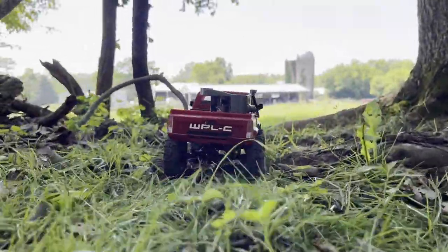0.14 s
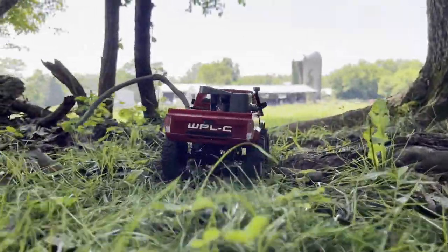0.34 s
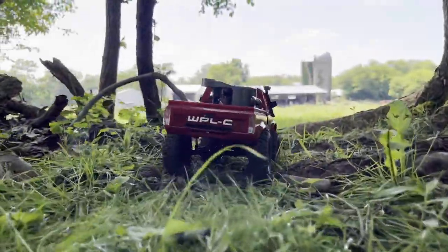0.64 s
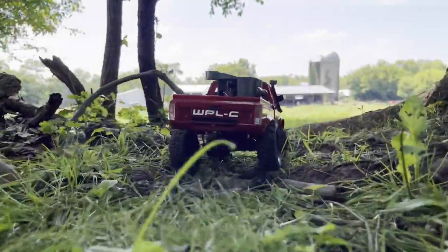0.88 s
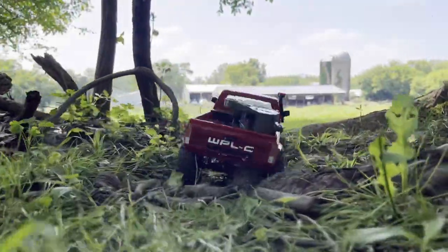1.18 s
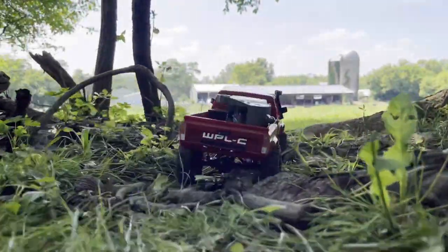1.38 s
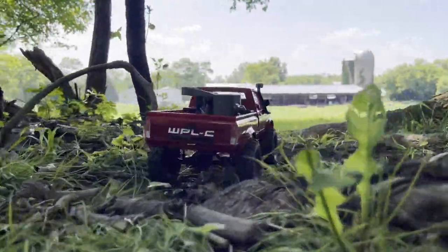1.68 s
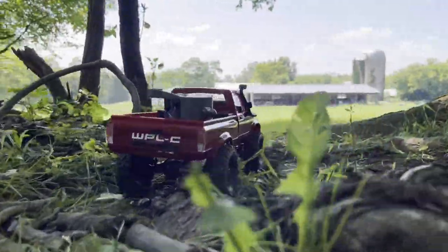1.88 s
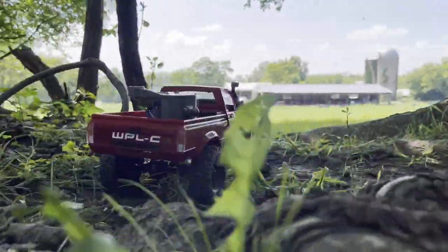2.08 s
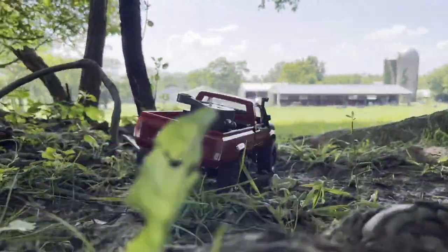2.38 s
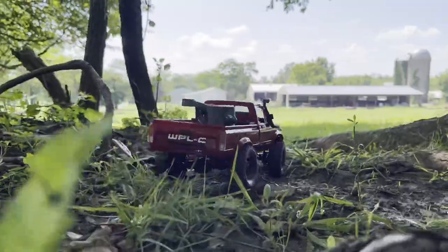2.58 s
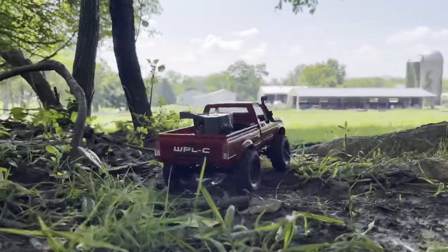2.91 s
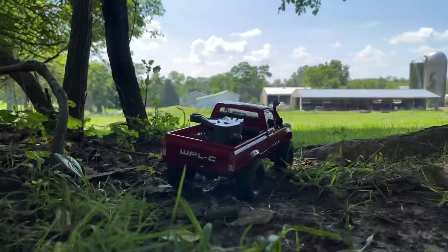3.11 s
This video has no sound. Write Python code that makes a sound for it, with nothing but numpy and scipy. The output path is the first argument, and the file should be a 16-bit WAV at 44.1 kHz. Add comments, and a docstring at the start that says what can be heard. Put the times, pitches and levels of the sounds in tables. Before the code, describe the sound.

A small electric toy truck crawls over rough ground. Two tiny hisses and faint gear whirs open; light knocks come around 0.3-0.7 s. From 1.0 to 1.45 s gears whine and rattle with hard plastic knocks and grass snaps. A lull to 2.0 s leaves wind thumps, distant engine hum and faint chirps. Fuller whining, rattling and sharp knocks around 2.3, 2.6 and 2.85 s continue, easing towards 3.25 s.

```python
"""Toy truck over rough ground

A small electric toy truck crawls over grass, roots and dirt. Its plastic gears rattle (shaped noise) and whine
with the load (sines at the tooth rate); the chassis knocks (decaying rings) and grass snaps (noise bursts).
Two thin hisses open the scene. Wind puffs thump on the microphones (low noise and falling pulses), a far engine
hums (wavering sines), a small bird chirps (arched whistles) and soft country air (noise) lies behind it all."""
import sys
import numpy as np
from scipy import signal
from scipy.fft import rfft, irfft, next_fast_len
from scipy.io import wavfile
from scipy.ndimage import uniform_filter1d, map_coordinates

SR = 44100
rng = np.random.default_rng(int(sys.argv[2]) if len(sys.argv) > 2 else 0)


def persist_wave(psi):
    """Save psi, clipped to +-1, as 16-bit WAV."""
    counts = np.round(np.clip(psi, -1, 1) * 32767).astype(np.int16)
    wavfile.write(sys.argv[1], SR, np.atleast_2d(counts).T)


def gain_from_db(level_db):
    """Turn a decibel level (scalar or array-like) into a linear amplitude factor."""
    decades = np.asarray(level_db, float) / 20
    return 10 ** decades


N = 143325
T = np.arange(N) / SR

# Event and source levels below are relative: each source sets its final trim. Spectra give shape only.

# gear train noise: (time [s], level [dB], treble over that level [dB])
DRIVE = [(0.0, -56, -13), (0.05, -61, -10.5), (0.1, -58, -10.5), (0.19, -67, -13.5), (0.37, -53, -8),
         (0.5, -53, -12), (0.71, -45, -3.5), (0.72, -48, -6.5), (0.84, -58.5, -7.5), (0.97, -58.5, -7),
         (1.071, -44, -4), (1.091, -35.5, -10), (1.181, -49, -11), (1.22, -41, -11), (1.23, -42.5, -13.5),
         (1.279, -39.5, -6.5), (1.31, -49, -11), (1.36, -50, -8.5), (1.43, -44, -8.5), (1.54, -61.5, -12.5),
         (1.58, -55, -5), (1.61, -61.5, -9), (1.92, -67, -21), (1.94, -64, -8), (1.96, -65, -9.5),
         (2.11, -46.5, -5), (2.18, -46, 1), (2.22, -43, -5), (2.28, -43.5, 4), (2.313, -47.5, 0),
         (2.34, -43, -1.5), (2.36, -46.5, -5.5), (2.45, -45.5, -1), (2.51, -41.5, -5.5), (2.57, -43, -9.5),
         (2.611, -39.5, -4.5), (2.73, -45, -11), (2.84, -42, -12.5), (2.85, -41, -2.5), (2.87, -39.5, -8),
         (3.03, -50, -8), (3.25, -48, -6)]
# gear whines, one table each: (time [s], tooth rate [Hz], level of 1st, 2nd, 3rd multiple [dB, dB, dB])
WHINES = [
    [(0.0, 1056, -66, -67.5, -64), (0.008, 1060, -72, -62, -63), (0.024, 1062, -80, -68, -61.5),
     (0.04, 1082, -87, -87, -84), (0.072, 1060, -86, -78, -61), (0.078, 1066, -82, -106, -68),
     (0.088, 1045, -81, -81, -60), (0.1, 1094, -78, -58, -54), (0.13, 1120, -88, -90, -75)],
    [(0.3, 1084, -72, -70, -87), (0.318, 1097, -64, -72, -91), (0.332, 1059, -77, -62, -76),
     (0.352, 1083, -57.5, -63, -85), (0.364, 1132, -62, -62, -79), (0.382, 1093, -63, -64, -84),
     (0.43, 1170, -55.5, -59, -72), (0.47, 1150, -80, -73, -77)],
    [(0.6, 473, -67, -62, -57), (0.608, 492, -62, -77, -65), (0.622, 506, -71, -59, -74),
     (0.642, 599, -76, -46, -66), (0.66, 719, -85.5, -70, -53), (0.686, 821, -77, -53.5, -50),
     (0.706, 838, -65, -43.5, -45.5), (0.73, 850, -77, -69, -58)],
    [(0.78, 1273, -71, -83, -82), (0.786, 1303, -76, -80, -69), (0.792, 1290, -70, -83, -63),
     (0.796, 1263, -71, -96, -54), (0.8, 1310, -86, -83, -59), (0.804, 1265, -70, -83, -57),
     (0.82, 1260, -78, -90, -73)],
    [(1.02, 911.7, -51, -57, -73), (1.036, 1025, -55, -51, -80), (1.042, 1063, -54, -57, -70),
     (1.062, 1192, -48, -50, -62), (1.07, 1240, -58, -66, -65), (1.076, 1300, -61, -60, -69),
     (1.085, 1297, -53, -51, -51)],
    [(1.22, 1155, -56, -58, -64), (1.23, 1163, -58, -42, -65), (1.242, 1135, -54, -46, -67),
     (1.25, 1158, -63, -44, -70), (1.266, 1111, -44, -46, -58), (1.274, 1080, -50, -40, -60),
     (1.284, 1032, -50, -41.5, -58), (1.3, 1025, -60, -54, -69)],
    [(1.37, 1198, -59, -71, -74), (1.382, 1185, -58, -52, -69), (1.392, 1190, -59, -60, -64),
     (1.4, 1202, -67, -63, -65), (1.414, 1207, -65, -51, -58), (1.422, 1193, -71, -66, -69),
     (1.442, 1220, -66, -52, -76), (1.45, 1184, -64, -64, -74)],
    [(1.553, 1062, -82, -75, -76), (1.559, 1155, -77, -76, -63), (1.569, 1276, -77, -51, -63),
     (1.573, 1250, -77, -58, -59), (1.579, 1154, -72, -64, -62), (1.587, 1080, -71, -55, -58),
     (1.593, 1000, -68, -69, -77), (1.6, 977.5, -68, -81, -83)],
    [(2.06, 515, -76, -68, -70), (2.066, 548, -78, -62, -66), (2.08, 634.5, -80, -75, -53.5),
     (2.102, 724, -81, -72, -52.5), (2.146, 878, -63, -52, -52.5), (2.17, 927, -63, -53, -52),
     (2.178, 900, -53, -61, -53), (2.19, 923.2, -59, -45, -65)],
    [(2.19, 935.8, -50, -48, -66), (2.224, 1112, -45, -46, -58), (2.25, 1173, -45, -42, -54),
     (2.272, 1143, -44, -46, -60), (2.31, 935, -66, -45, -44), (2.324, 966, -41.5, -61, -57),
     (2.34, 973, -59, -42, -65), (2.36, 950, -66, -62, -74)],
    [(2.44, 1484, -80, -66, -66), (2.466, 1430, -47, -59, -58), (2.502, 1304, -49, -43, -64),
     (2.518, 1300, -44, -46, -66), (2.542, 1265, -49, -45, -66), (2.55, 1260, -48, -51, -66),
     (2.565, 1313, -72, -55, -72)],
    [(2.57, 1178, -53, -54, -39), (2.582, 1180, -59, -46, -43), (2.594, 1247, -48, -37, -48),
     (2.606, 1181, -45, -36.5, -47), (2.63, 1156, -40, -44, -45), (2.636, 1160, -40.5, -38.5, -58),
     (2.65, 1100, -40.5, -50, -47), (2.67, 1140, -49, -66, -47)],
    [(2.84, 1086, -59, -51, -69), (2.852, 1060, -44, -39, -47), (2.858, 1085, -39.5, -29.5, -49),
     (2.866, 1000, -49, -52, -45), (2.872, 960, -59, -59, -61), (2.88, 969.3, -59, -65, -73)],
    [(2.885, 1250, -60, -50, -63), (2.912, 1225, -58, -46, -62), (2.93, 1162, -76, -49, -68),
     (2.944, 1226, -57, -43.5, -53), (2.96, 1184, -69, -44.5, -83), (2.97, 1130, -59, -51, -76),
     (2.985, 1120, -58, -62, -70)],
    [(2.985, 1295, -75, -71, -67), (3.001, 1333, -60, -54, -66), (3.015, 1203, -53, -55, -70),
     (3.037, 1070, -59, -52, -66), (3.069, 1058, -55.5, -64, -75), (3.085, 1207, -45.5, -65, -72),
     (3.101, 1330, -72, -47, -73), (3.11, 1320, -57.5, -55, -72)],
    [(3.11, 1456, -71, -58, -60), (3.132, 1485, -53, -46, -77), (3.148, 1495, -58, -48.5, -67),
     (3.168, 1490, -49, -64, -78), (3.186, 1305, -71, -58, -72), (3.2, 1240, -64, -71, -87),
     (3.226, 1285, -51, -61, -58), (3.25, 1310, -57, -68, -76)],
]
# higher multiples of the tooth rate: (multiple [number], level against the 3rd [dB])
HIGH_MULTIPLES = [(4, -9), (5, -17), (6, -18), (8, -17), (9, -17)]
# colour of the plastic shell: (frequency [Hz], density [dB per Hz])
SHELL = [(150, -39), (400, -15.5), (750, -10), (1150, -2.5), (1700, -8.5), (2350, -4), (2900, -10.5),
         (3300, -7.5), (3450, -6), (3620, -9), (4100, -9), (4300, -8), (4500, -11.5), (5000, -23),
         (5600, -72)]
# treble of the gear noise: (frequency [Hz], density [dB per Hz])
FIZZ = [(4000, -72), (5000, -6), (6400, -1), (7500, -5.5), (9000, 0.5), (10500, -3), (12000, -9),
        (13700, -14), (14300, -54), (15700, -76)]
# chassis knocks: (time [s], level [dB], pitch [Hz], decay by 60 dB [s])
KNOCKS = [(.309, -43.5, 895, 0.045), (0.372, -40.5, 965, 0.042), (0.549, -37, 576, 0.043),
          (.6, -39, 780, 0.026), (.711, -37, 670, 0.016), (1.085, -25, 1243, 0.024),
          (1.092, -23.5, 3880, 0.022), (1.104, -20, 4130, 0.0054), (1.114, -22, 4900, 0.008),
          (1.112, -27.5, 946, 0.035), (1.125, -27, 766, 0.02), (1.131, -35.5, 350, 0.11),
          (1.152, -32, 3300, 0.029), (1.2126, -21.5, 1254, 0.026), (1.2165, -22, 1285, 0.023),
          (1.507, -42, 2950, .02), (1.631, -50, 1970, 0.018), (1.933, -38, 956, 0.028),
          (1.988, -49, 1910, 0.033), (2.271, -28, 590, 0.023), (2.3172, -20.5, 3680, 0.013),
          (2.32, -26.5, 2100, .014), (2.584, -32, 630, 0.029), (2.6282, -22, 3130, 0.0069),
          (2.796, -34, 783, 0.03), (2.847, -29.5, 2127, 0.027), (2.893, -27, 1960, 0.025),
          (2.904, -28, 990, 0.014)]
# grass and twig snaps: (time [s], level [dB], decay by 60 dB [s])
SNAPS = [(0.9981, -42, 0.018), (1.0566, -31, 0.015), (1.064, -32, 0.015), (1.085, -27, 0.015),
         (1.0916, -30, 0.015), (1.104, -22, 0.015), (1.1538, -43, 0.015), (1.177, -37.5, 0.015),
         (1.215, -39, 0.013), (1.3753, -48, 0.017), (2.3177, -21.5, 0.014), (2.403, -29, 0.015),
         (2.5721, -35, 0.015), (2.6262, -27, 0.01), (2.8504, -45, 0.015)]
# thin high hisses: (start [s], length [s], level [dB])
HISSES = [(0, .045, -68), (0.057, .065, -63)]
# colour of the hisses: (frequency [Hz], density [dB per Hz])
HISS_BAND = [(9000, -20), (12000, -4), (13700, 0), (14400, -6), (14700, -60)]
# wind on the microphones: (time [s], level [dB], deep bass over that level [dB])
WIND = [(0, -66, 0), (.25, -39, -1), (.42, -49, -10), (.6, -39.5, 5.5), (.75, -38.5, -0.5), (.9, -38, -5.5),
        (1.05, -36, -1), (1.18, -37.5, -9), (1.4, -34.5, -12), (1.65, -37.5, 3.5), (1.8, -39, 4),
        (2.0, -41.5, 8.5), (2.06, -57, -2), (2.2, -47, -3), (2.4, -61, -2.5), (2.6, -52, 3),
        (2.72, -54.5, 1), (3, -48.5, -4.5), (3.25, -45.5, -14)]
# colour of the wind buffeting: (frequency [Hz], density [dB per Hz])
BUFFET = [(15, -58), (25, -30), (54, 6), (102, 6), (178, -7), (270, -21.5), (400, -26), (520, -59),
          (880, -120)]
# colour of the deep wind bass: (frequency [Hz], density [dB per Hz])
DEEP = [(15, -48), (30, -10.5), (55, 0.5), (80, -7.5), (120, -22.5), (200, -67)]
# single puffs: (time [s], level [dB], last pitch [Hz], length [cycles], start above last pitch [ratio])
PUFFS = [(0.258, -29.5, 53, 1.9, 0.38), (0.507, -30, 64, 1.34, .6), (0.652, -21, 74.5, 1.08, 0.39),
         (0.828, -20, 59, 2.46, 3.22), (1.039, -21.5, 110.4, 3.3, 0.19), (1.305, -23.5, 60, 1.6, 0.46),
         (1.564, -24.5, 74.4, 0.9, 0.81), (1.62, -25, 91.6, 1.9, 0.94), (1.69, -23.5, 75.4, 3.1, 0.57),
         (1.736, -16.5, 67.7, 1.96, 3.17), (1.779, -26, 54.4, 1.7, 0.2), (1.945, -27, 96.3, 1.9, 0.43),
         (2.2, -32, 62, 1.3, 0.51), (2.612, -27.5, 146, 1.3, 0.6), (2.629, -27.5, 74.6, 1.5, 1.04),
         (2.814, -33, 74, 2.5, 2.3), (2.939, -26, 73.5, 1.2, 1.23)]
# far engine lines: (frequency [Hz], level at first [dB], level once the load has changed [dB])
HUM = [(107.1, -49.5, -56.5), (131.2, -45.5, -60.5), (157.8, -57, -60), (210, -52.5, -53.5),
       (262, -59, -57.5), (322.4, -67.5, -59)]
# start and end of the engine's load change: (time [s])
LOAD_CHANGES_S = [1.47, 2.48]
# bird chirps: (start [s], length [s], start pitch [Hz], arch pitch [Hz], end pitch [Hz], level [dB])
CHIRPS = [(1.655, 0.06, 4300, 5800, 4400, -69), (1.76, .045, 3600, 4700, 4000, -68.5),
          (1.77, 0.0355, 5900, 5800, 6200, -77), (.395, 0.058, 5600, 5800, 5200, -66)]
# colour of the countryside air: (frequency [Hz], density [dB per Hz])
AIR = [(110, -42), (180, -5.5), (209, -8), (271, -9.5), (379, -18.5), (409, -18.5), (502, -20.5),
       (2640, -49), (4790, -34.5), (13600, -68.5), (14300, -100)]
# phase between the two microphone ports: (frequency [Hz], lead of the left [rad])
LEAD = [(0, 0), (1980, 0.5), (2930, 1.26), (4570, 1.16), (7750, -2), (8870, -1.5), (11100, -7.5),
        (13000, -5), (14100, -6.5), (15300, -9.5)]
# likeness of the two ports for near sounds: (frequency [Hz], likeness [0-1])
ALIKE = [(30, 1), (110, 0.81), (300, 1), (2000, 0.86), (5000, 0.3), (8200, 0.76), (15000, 0.24)]
# likeness of the two ports for far sounds: (frequency [Hz], likeness [0-1])
AIR_ALIKE = [(60, 0.68), (300, 0.98), (700, 0.23), (3000, 0.21), (8200, 0.32), (15000, .6)]
# tone of the ports' sum, with cancelled bands: (frequency [Hz], gain [dB])
SUM_TONE = [(7000, 0), (7550, -1), (7800, -19.5), (8600, -33), (8950, -4.5), (9400, 0.5), (13600, -0.5),
            (14200, -1), (15700, -12)]
# tone of the ports' difference, with cancelled bands: (frequency [Hz], gain [dB])
DIFFERENCE_TONE = [(1600, 1.5), (1950, -3), (2300, -3), (10900, 1), (11300, -43), (13000, -37), (13400, 4)]

GRIT_PER_S, GRIT_DB = 260, -12  # ticks of sand and stems, against the rattle
WHINE_ROUGH, WHINE_FADE_S = .008, .005  # random pitch shake as a fraction; fade at each end
WHINE_FLUTTER_DB, RASP_DB = 1.4, .85  # slow flutter; fast flutter, growing up to the 4th line
PINION_TEETH, WOBBLE_DEPTH = 10, .45  # the off-centre pinion throbs once a turn
SHELL_RING_HZ, SHELL_RING_WIDTH_HZ, SHELL_RING_DB = 4240, 240, 8.5  # a shell mode lifts lines crossing it
HARD_KNOCK_DB = -26  # harder knocks crack more, softer ones less
PUFF_FALL_S = 0.0077  # time constant of the pitch fall
AIR_DB = -53.5


def unit(x):
    """Scaled to rms 1."""
    return x / np.sqrt(np.mean(x ** 2) + 1e-20)


def along(points, hz):
    """Reads (frequency, value) points on a log frequency axis."""
    f, v = np.transpose(points)
    return np.interp(np.log(hz + 1), np.log(f + 1), v)


def wobble(rate):
    """A smooth random curve, rate knots a second."""
    return map_coordinates(rng.standard_normal(int(N * rate / SR) + 4), [T * rate])


def filtered(x, response):
    """x times a complex response of frequency."""
    m = next_fast_len(N + 8192)
    return irfft(rfft(x, m) * response(np.fft.rfftfreq(m, 1 / SR)), m)[..., :N]


def rush(spectrum, patchy_db, channels=2):
    """Coloured noises of joint rms 1, with patches of random gain over time and frequency."""
    z = signal.stft(rng.standard_normal((channels, N)), nperseg=512)[2]
    field = uniform_filter1d(rng.standard_normal(z.shape[1:]), size=2, axis=0)
    field = uniform_filter1d(field, size=6, axis=1)
    x = signal.istft(z * gain_from_db(patchy_db * unit(field)), nperseg=512)[1][:, :N]
    return unit(filtered(x, lambda hz: gain_from_db(along(spectrum, hz))))


def add(track, s, sound):
    """Mixes a sound in at time s."""
    part = track[max(round(s * SR), 0):][:len(sound)]
    part += sound[:len(part)]


def gears():
    """Rattle of the gear train in the shell, its treble flickering, with ticks of grit."""
    s, level_db, treble_db = np.transpose(DRIVE)
    jolts_db = 1.71 * wobble(34.686) + 0.64 * wobble(250)
    hits = rng.random(N) < GRIT_PER_S / SR
    ticks = hits * rng.standard_normal(N) * gain_from_db(2.5 * rng.exponential(size=N))
    # grit takes only a faint colour from the shell
    grit = filtered(ticks, lambda hz: gain_from_db(0.22 * along(SHELL, hz)) * (hz < 13800))
    grit = gain_from_db(GRIT_DB) * unit(grit)
    rattle = rush(SHELL, patchy_db=3.5) + [grit, 0 * grit]
    body = gain_from_db(np.interp(T, s, level_db) + jolts_db - 2.0) * rattle
    fizz_db = np.interp(T, s, level_db + treble_db) + jolts_db + 0.59 * wobble(400) + 1.5
    return body + gain_from_db(fizz_db) * rush(FIZZ, patchy_db=3.5)


def whine():
    """Teeth meshing at the motor's speed; each overtone flutters on its own."""
    out = np.zeros(N)
    shake = WHINE_ROUGH * wobble(300)
    flutter = [gain_from_db(WHINE_FLUTTER_DB * wobble(70) + RASP_DB * min(k + 1, 4) * wobble(350)) for k in range(8)]
    for rows in WHINES:
        s, *columns = np.transpose(rows)
        hz, *low_db = [np.interp(T, s, column) for column in columns]
        lines = list(enumerate(low_db, 1)) + [(k, low_db[2] + db) for k, db in HIGH_MULTIPLES]
        turn = 2 * np.pi * np.cumsum(hz * (1 + shake)) / SR
        gate = np.clip(np.minimum(T - s[0], s[-1] - T) / WHINE_FADE_S, 0, 1)
        for (k, db), gain in zip(lines, flutter):
            throb = 1 + WOBBLE_DEPTH * np.sin(turn / PINION_TEETH + k)
            out += gate * gain_from_db(db + 2.0) * gain * throb * np.sin(k * turn)

    def shell_mode(hz):
        return gain_from_db(SHELL_RING_DB * np.exp(-((hz - SHELL_RING_HZ) / SHELL_RING_WIDTH_HZ) ** 2))
    return filtered(out, shell_mode)


def knocks():
    """The chassis hits roots and stones: a dull plastic ring with a short crack through the shell."""
    ring, crack, t = np.zeros(N), np.zeros(N), T[:4096]
    noises = rng.standard_normal((len(KNOCKS), len(t)))
    for (s, db, hz, t60), noise in zip(KNOCKS, noises):
        fall = gain_from_db(db - 60 * t / t60) * (1 - np.exp(-t / 0.0014))
        turn = 2 * np.pi * hz * t
        modes = np.sin(turn) + 0.24 * np.sin(1.7 * turn) + 0.49 * np.sin(0.6 * turn)
        add(ring, s, fall * modes)
        add(crack, s, fall * noise * gain_from_db(0.52 * (db - HARD_KNOCK_DB)))
    crack = filtered(crack, lambda hz: gain_from_db(0.29 * along(SHELL, hz)))
    return gain_from_db(-1.5) * ring + gain_from_db(3) * crack


def snaps():
    """Dry stems snap under the tyres: short bright bursts of decaying noise."""
    out, t = np.zeros(N), T[:2048]
    noises = rng.standard_normal((len(SNAPS), len(t)))
    for (s, db, t60), noise in zip(SNAPS, noises):
        add(out, s, gain_from_db(db - 60 * t / t60) * (1 - np.exp(-t / 0.00088)) * noise)
    bright = [(1500, -30), (4000, -2.0), (10500, 2.0), (15700, -6)]
    return gain_from_db(0.5) * filtered(out, lambda hz: gain_from_db(along(bright, hz)))


def hiss():
    """Two short bursts of very high noise at the start, each swelling and fading."""
    gate = np.zeros(N)
    for s, length, db in HISSES:
        arch = np.sin(np.pi * np.clip((T - s) / length, 0, 1))
        gate += gain_from_db(db) * np.sqrt(arch ** 2)
    return gate * rush(HISS_BAND, patchy_db=2.5)


def wind():
    """Low lumpy buffeting with single puffs, each a low thump whose pitch falls fast."""
    s, level_db, deep_db = np.transpose(WIND)
    out = gain_from_db(np.interp(T, s, level_db) + 2.28 * wobble(16)) * rush(BUFFET, patchy_db=3.0)
    out += gain_from_db(np.interp(T, s, level_db + deep_db) + 3.2 * wobble(12.03)) * rush(DEEP, patchy_db=-4.0)
    t = T[:8192]
    for s, db, hz, cycles, above in PUFFS:
        turn = 2 * np.pi * hz * (t + above * PUFF_FALL_S * (1 - np.exp(-t / PUFF_FALL_S)))
        swell = (1 - np.exp(-t / 0.0019)) ** 2 * np.exp(-1.6 * (t * hz / cycles) ** 2)
        add(out[0], s, -gain_from_db(db + 1.5) * swell * np.sin(turn))  # every puff starts negative
    return out


def engine():
    """Far engine: low lines wavering in pitch and level, rebalanced as its load changes."""
    out = np.zeros(N)
    for hz, *levels_db in HUM:
        level_db = np.interp(T, LOAD_CHANGES_S, levels_db) + 1.5 + 3.67 * wobble(13)
        out += gain_from_db(level_db) * np.sin(2 * np.pi * np.cumsum(hz + 3 * wobble(15)) / SR)
    return out


def bird():
    """Thin far whistles, each a sine on a curved pitch path with a fast tremble."""
    out = np.zeros(N)
    for s, length, hz0, hz1, hz2, db in CHIRPS:
        u = np.arange(int(length * SR)) / (length * SR)
        # a parabola through the start, arch and end pitches
        hz = hz0 * (1 - u) * (1 - 2 * u) + 4 * hz1 * u * (1 - u) + hz2 * u * (2 * u - 1)
        hz = hz + 260 * wobble(606)[:len(u)]
        add(out, s, gain_from_db(db + 6) * np.sqrt(np.sin(np.pi * u)) * np.sin(2 * np.pi * np.cumsum(hz) / SR))
    return out * gain_from_db(2.7 * wobble(200))


def air():
    """Countryside air: a steady bed of soft, patchy noise."""
    return gain_from_db(AIR_DB) * rush(AIR, patchy_db=-4.0)


def ports(pair, alike):
    """A shared sound and an unrelated one reach the two ports, with a phase lead on the left."""
    def shares(hz):
        angle = np.arccos(np.clip(along(alike, hz), 0, 1)) / 2
        return [np.cos(angle), np.sin(angle)]
    shared, unrelated = filtered(pair, shares)
    both = np.array([shared + unrelated, shared - unrelated])
    return filtered(both, lambda hz: np.exp(.5j * np.outer([1, -1], along(LEAD, hz))))


def scene():
    """Truck in front, wind and engine below, air all round."""
    near = gears() + wind()
    near[0] += whine() + knocks() + snaps() + engine()  # row 0 is shared by both ports
    near += hiss()
    far = air()
    far[0] += bird()
    balance = gain_from_db([[.2], [-.2]])  # left and right, dB
    return ports(near, ALIKE) * balance + ports(far, AIR_ALIKE)


def roll_off(x):
    """The treble ends steeply here."""
    return signal.sosfilt(signal.butter(12, 15740, fs=SR, output="sos"), x)


def record(dry):
    """The sum and difference of the two ports each lose some treble bands."""
    pair = np.array([dry[0] + dry[1], dry[0] - dry[1]]) / 2
    mid, side = filtered(pair, lambda hz: gain_from_db([along(SUM_TONE, hz), along(DIFFERENCE_TONE, hz)]))
    return roll_off(np.array([mid + side, mid - side]))


dry = scene()
out = record(dry)
persist_wave(out)
```